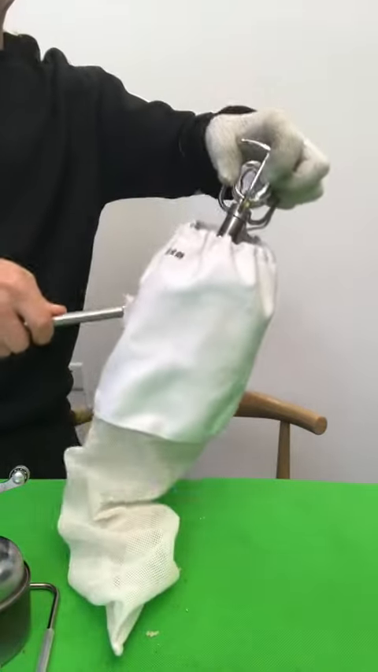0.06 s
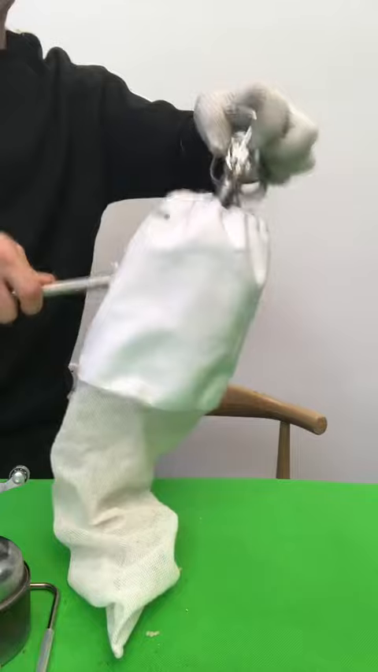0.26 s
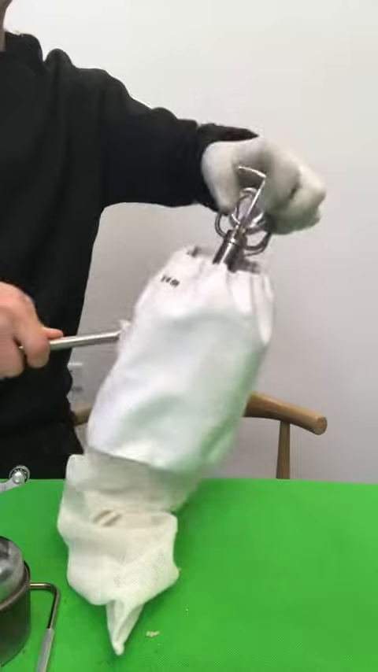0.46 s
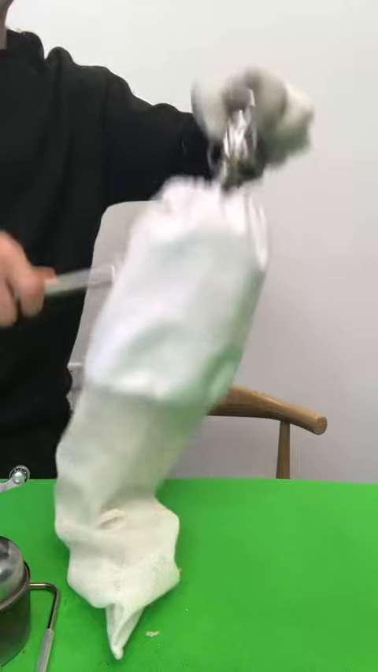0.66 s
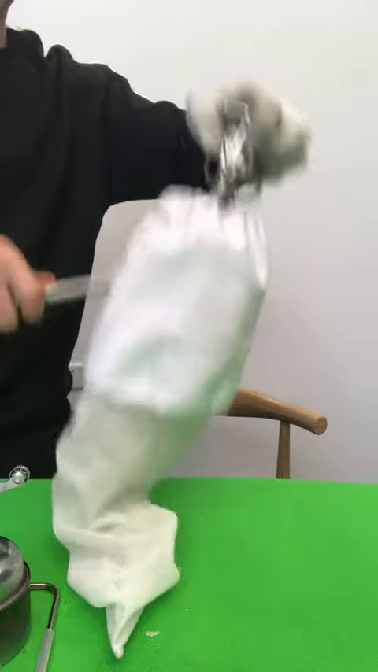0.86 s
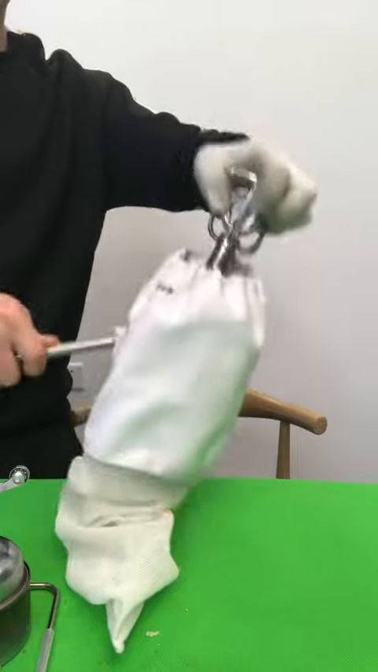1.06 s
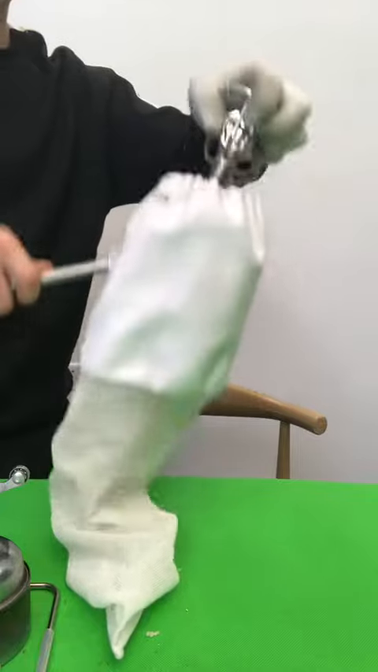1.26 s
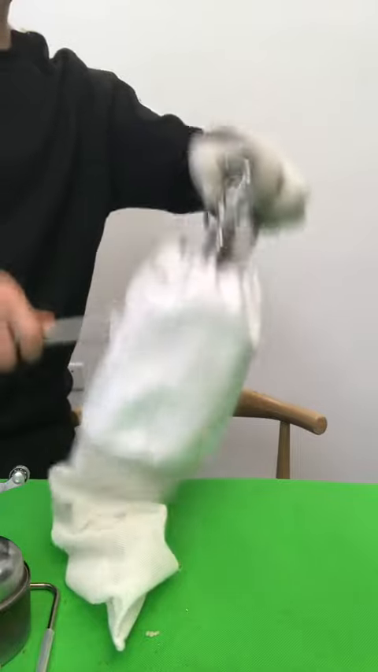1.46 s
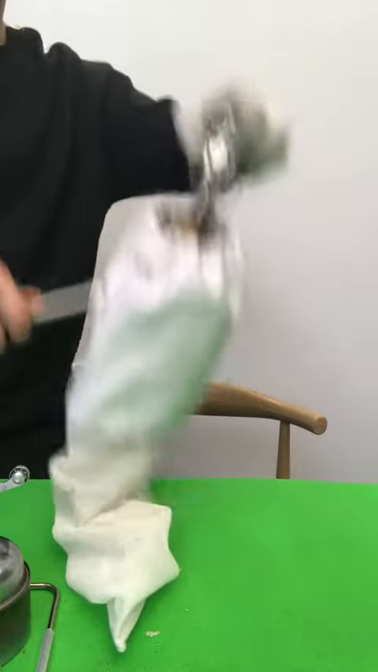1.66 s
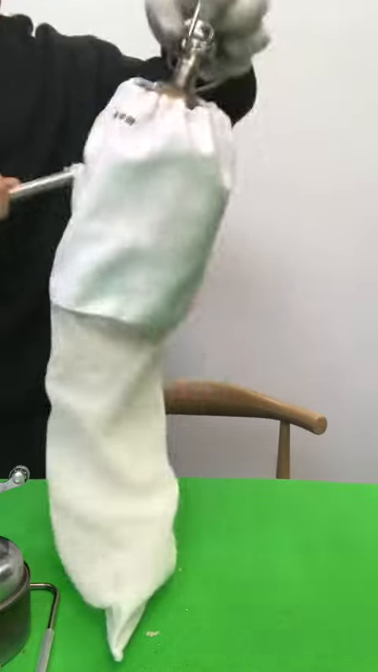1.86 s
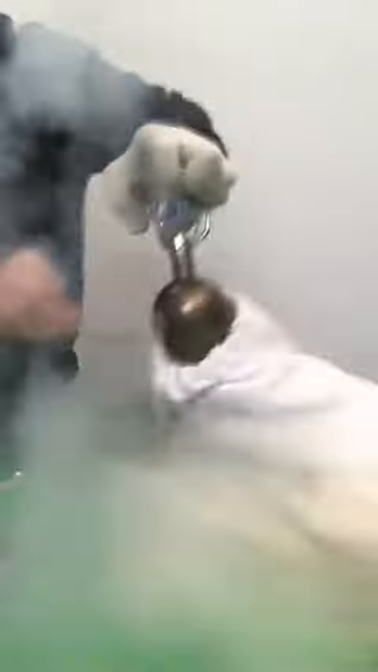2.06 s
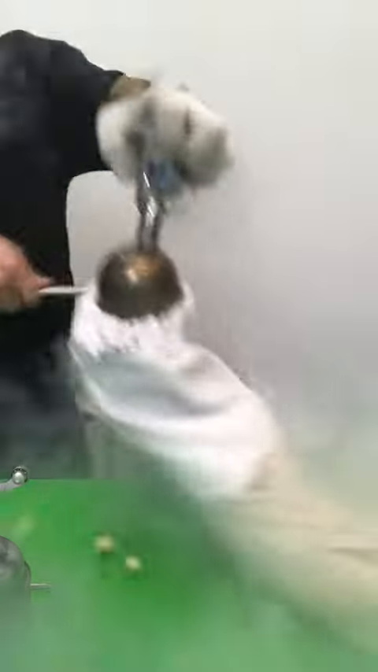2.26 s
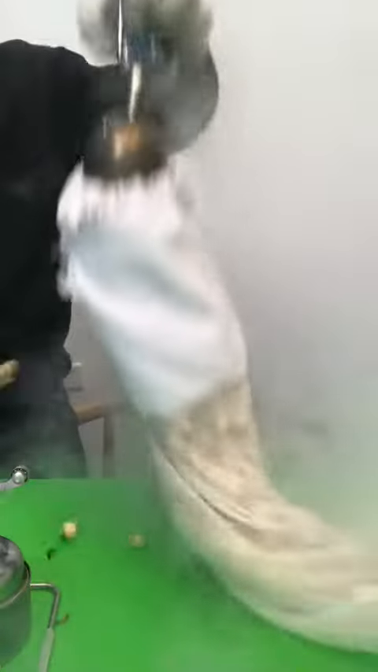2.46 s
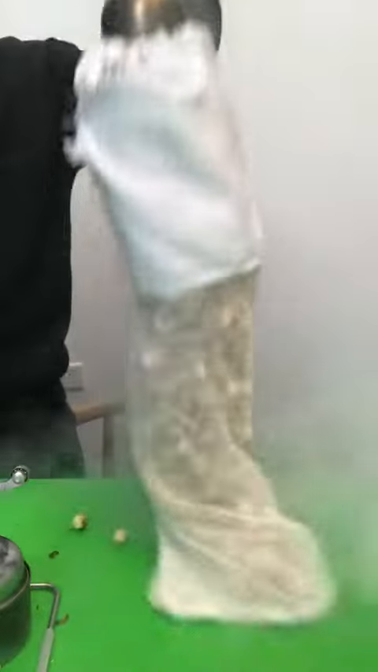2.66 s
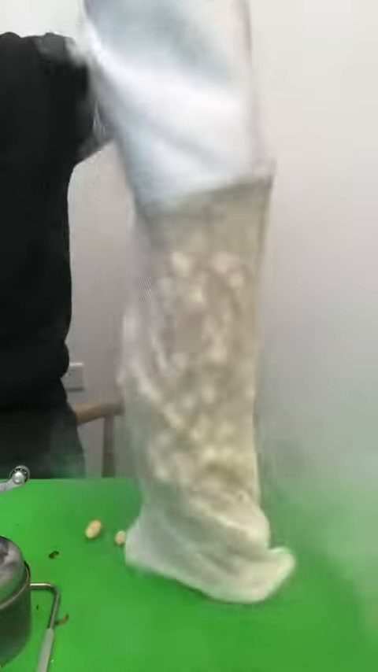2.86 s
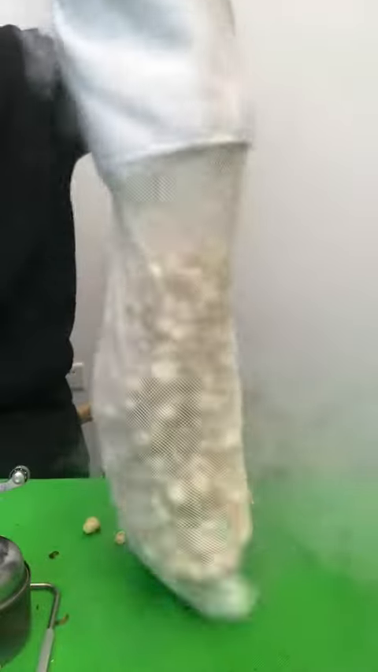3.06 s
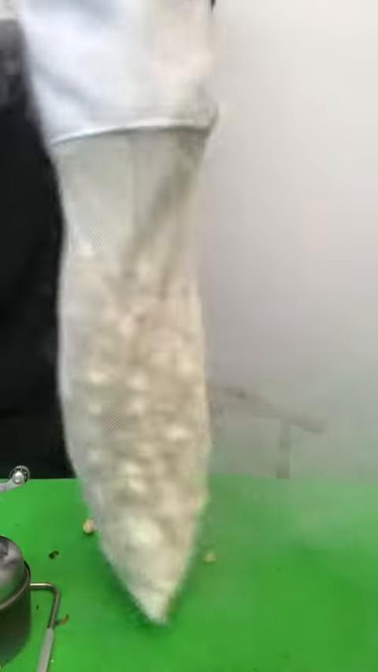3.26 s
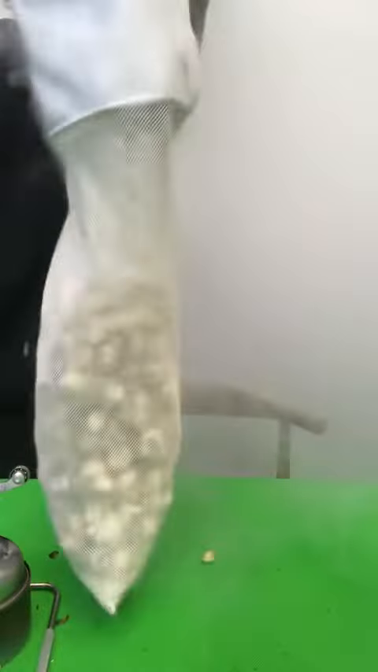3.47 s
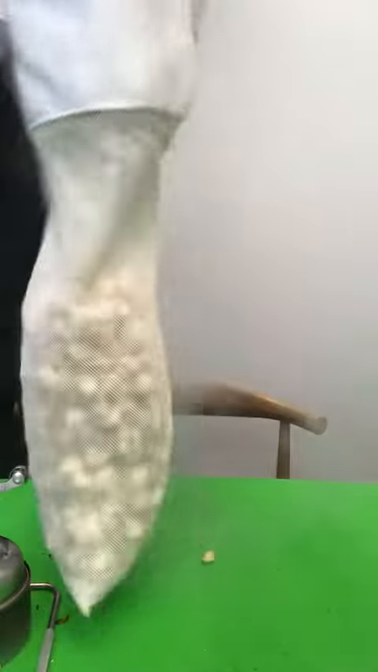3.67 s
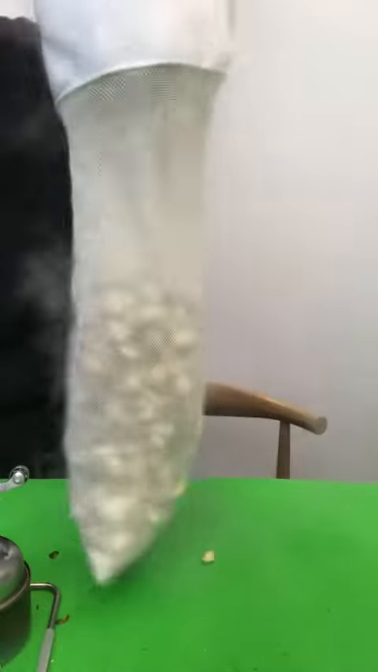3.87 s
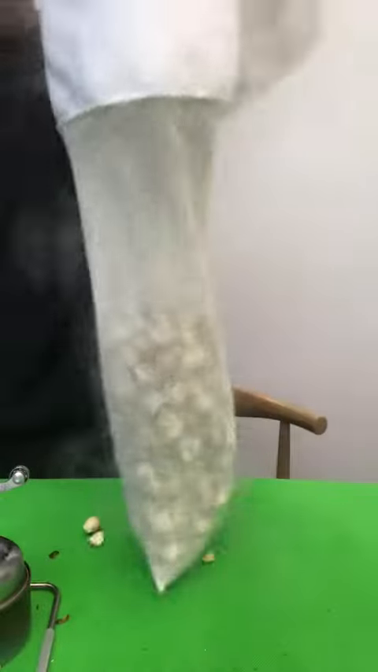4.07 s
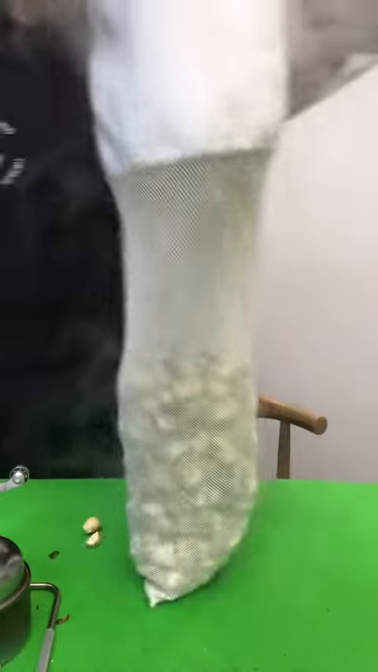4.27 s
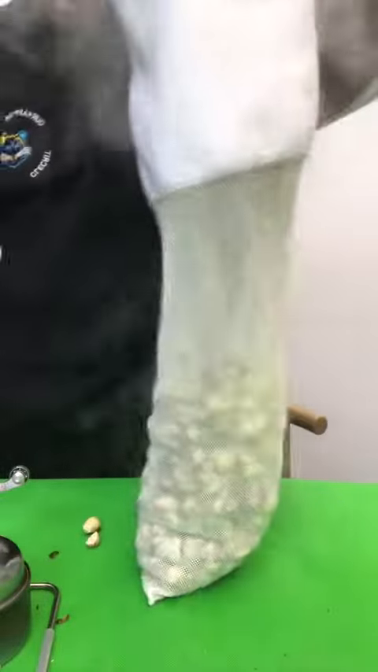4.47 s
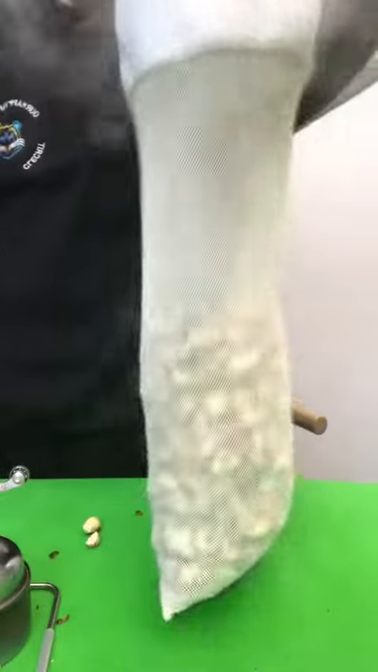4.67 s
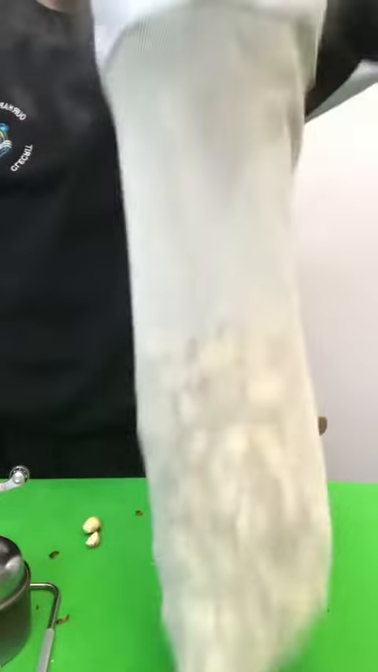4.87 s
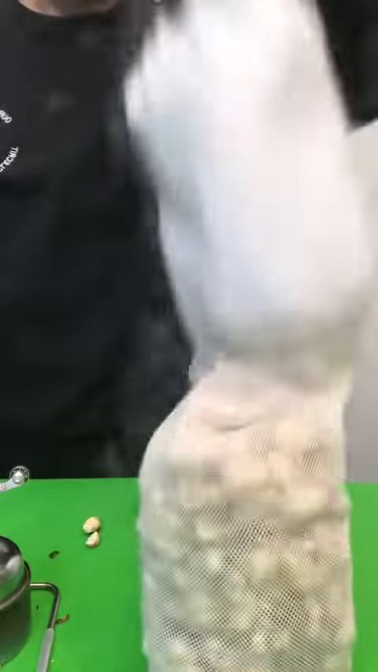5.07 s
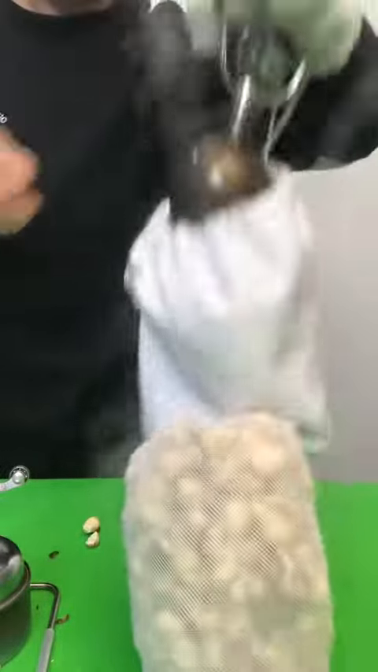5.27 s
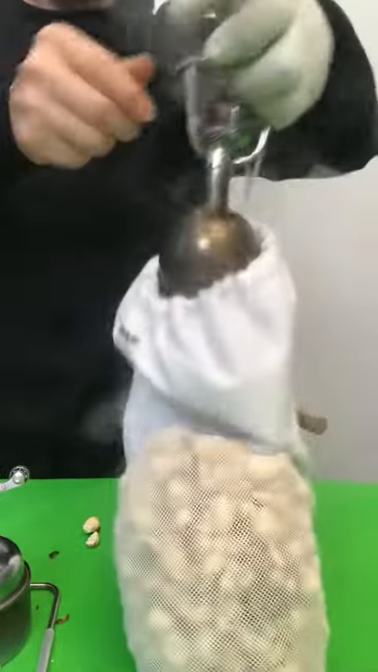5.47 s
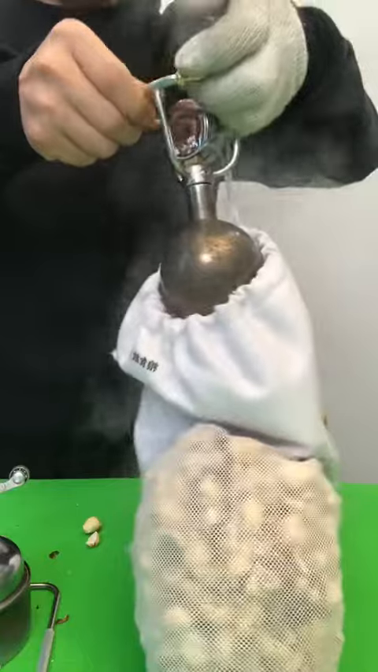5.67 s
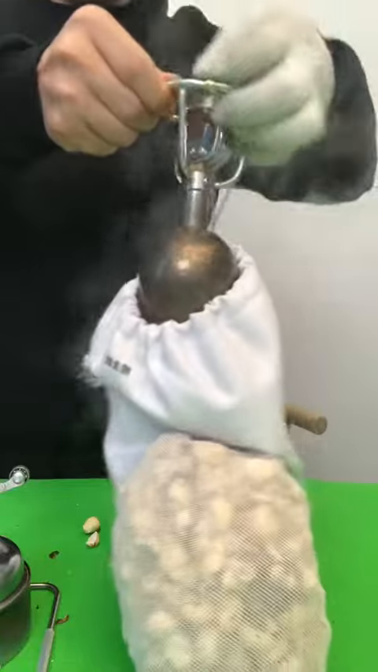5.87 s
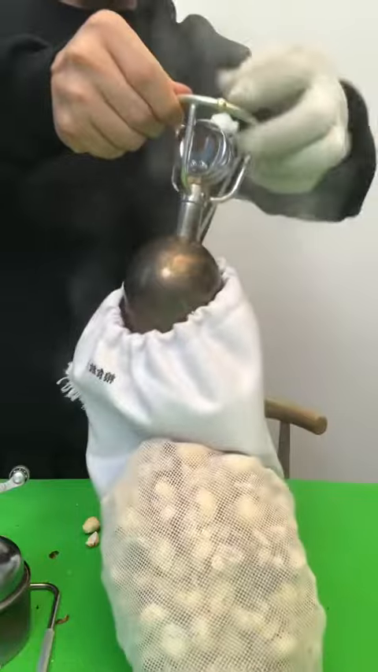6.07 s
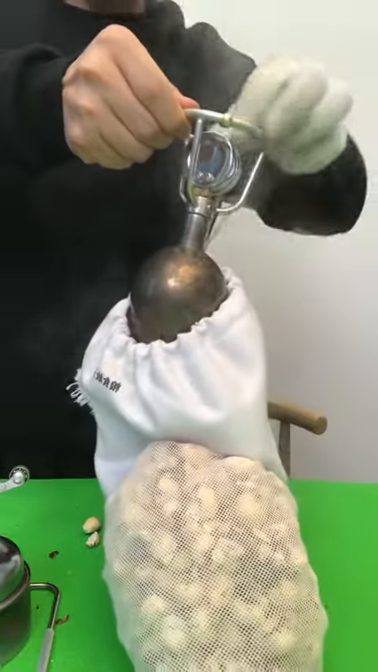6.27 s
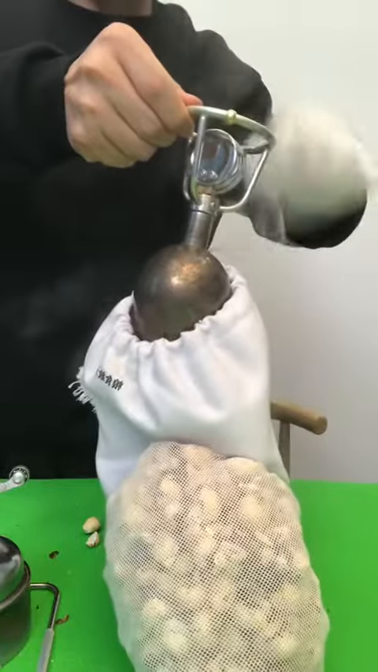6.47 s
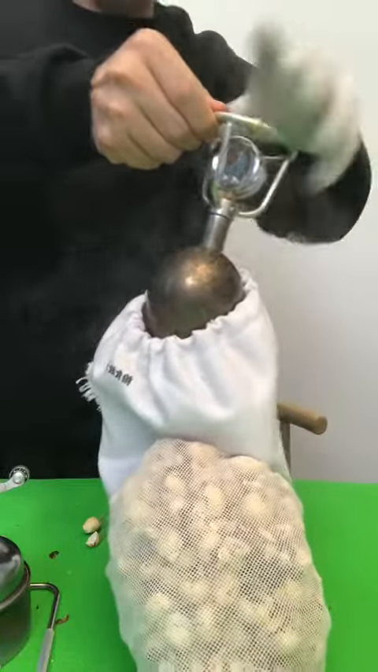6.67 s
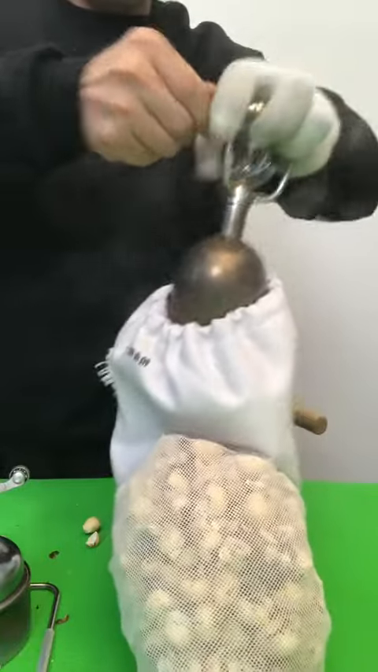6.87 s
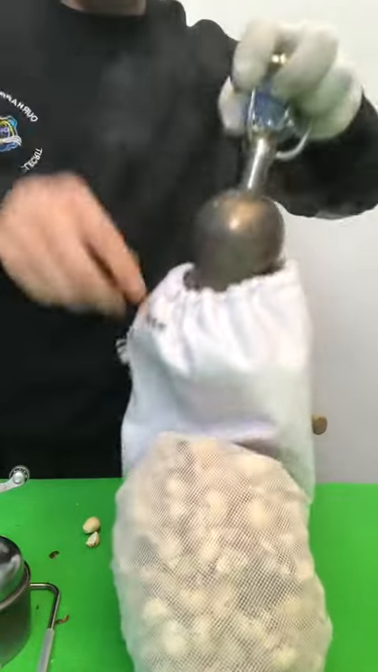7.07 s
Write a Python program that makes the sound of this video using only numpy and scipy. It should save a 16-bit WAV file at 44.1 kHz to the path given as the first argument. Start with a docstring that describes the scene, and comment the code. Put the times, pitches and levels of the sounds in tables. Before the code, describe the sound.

For the first two seconds there is only quiet room air, faint low machinery hum and a light cloth swish around 1.6 s. At 2.03 s a pressure popper bursts with an extremely loud double crack, a short blast of steam and a deep boom; the level is pushed down, then swells back under an echo lasting nearly a second, with a dry snap at 2.25. From 2.85 to 4.2 s puffed grain rustles and hisses crisply in mesh while steel handle links clink rapidly, bright and high, with scrapes and thin squeaks. Table thumps and dry pattering come at about 4.4 s. Another rustle with clinks and a squeak follows at 5 s, then softer shuffling. Around 5.95 to 6.25 s a wire bail taps and pings with small squeaks. A dull knock sounds at 6.7 s, then sharp clinks and a brief rustle from 6.9 to 7.1 s.

```python
"""A small pressure popper bursts open: sharp shocks, a blast of steam and grain into a cloth bag, a boom and an echo.
Then it is shaken out: handle links clink, scrape and squeak, and puffed grain rustles in the mesh.
Things thump on the table, and the steel bail pings. Knocks are ringing sines; steam, grain and air are coloured noise.
The bag swishes before the bang. The recorder's gain ducks under the bang and swells back under the echo."""
import sys
import numpy as np
from scipy import signal
from scipy.fft import rfft, irfft, next_fast_len
from scipy.io import wavfile
from scipy.ndimage import uniform_filter1d, minimum_filter1d

SR = 44100
rng = np.random.default_rng(int(sys.argv[2]) if len(sys.argv) > 2 else 0)


def master_out(mix):
    """Clip the mix to full scale and print it as 16-bit PCM to the path in sys.argv[1]."""
    frames = np.transpose(np.atleast_2d(mix))
    ceiling = np.clip(frames, -1, 1)
    pcm = np.round(ceiling * 32767).astype(np.int16)
    wavfile.write(sys.argv[1], SR, pcm)


N = 313232
TIME = np.arange(N) / SR


def from_db(db):
    """Turn decibels into a gain."""
    return 10 ** (np.asarray(db) / 20)


def rms_one(x):
    """Scale a sound to rms 1."""
    return x / np.sqrt(np.mean(x ** 2) + 1e-20)


def at_hz(points, hz):
    """Read a curve between its points, along a log-frequency axis."""
    f, value = np.transpose(points)
    return np.interp(np.log(hz + 1e-9), np.log(f), value)


def add(out, s, sound):
    """Mix a sound in, starting at s seconds."""
    start = round(s * SR)
    out[start:start + len(sound)] += sound[:max(N - start, 0)]


def colour(x, spectrum):
    """Shape a noise to a spectrum, drop what lies below 15 Hz, and scale to rms 1."""
    size = next_fast_len(len(x))
    hz = np.arange(size // 2 + 1) * SR / size
    shaped = rfft(x, size) * from_db(at_hz(spectrum, hz)) * (hz > 15)
    return rms_one(irfft(shaped, size)[:len(x)])


def fade(t, t60):
    """Die away smoothly, by 60 dB in t60 seconds."""
    return np.exp(-np.log(1000) * t / t60)


def surge(peak_s, rise_s, t60):
    """Climb 20 dB in the rise time, peak at 1, then die away."""
    t = TIME - peak_s
    level_db = np.minimum(20 * t / rise_s, -60 * t / t60)
    return from_db(np.maximum(level_db, -200))


def ring(x, hz, t60):
    """A resonance: a click of size 1 sets a dying sine of about height 1 ringing."""
    r, w = fade(1 / SR, t60), 2 * np.pi * hz / SR
    return signal.lfilter([0, np.sin(w)], [1, -2 * r * np.cos(w), r * r], x + 1e-18)


def strike(times, levels_db, modes, spread_db):
    """Blows on one body: each excites every mode with a random strength and sign."""
    out = np.zeros(N)
    at = np.minimum(np.round(np.asarray(times) * SR).astype(int), N - 1)
    for hz, mode_db, t60 in modes:
        clicks = np.zeros(N)
        sizes_db = levels_db + mode_db + spread_db * rng.standard_normal(len(at))
        clicks[at] = from_db(sizes_db) * rng.choice([-1, 1], len(at))
        out += ring(clicks, hz, t60)
    return out


def grains(per_s, spread_db):
    """Tiny contacts at random moments, of uneven size and random sign."""
    sizes = from_db(spread_db * np.minimum(rng.exponential(1, N), 4))
    return (rng.random(N) < per_s / SR) * sizes * rng.choice([-1, 1], N)


def dying_noise(spectrum, t60s, hold):
    """Two seconds of noise that starts near rms 1, holds, then dies at a different pace in each band."""
    t = TIME[:2 * SR]
    bins = rfft(colour(rng.standard_normal(len(t)), spectrum))
    hz, centres = np.arange(len(bins)) * SR / len(t), np.geomspace(30, 16000, 14)
    out = np.zeros(len(t))
    for f, row in zip(centres, np.eye(len(centres))):
        band = irfft(bins * np.interp(hz, centres, row))
        out += band * fade(np.maximum(t - hold, 0), at_hz(t60s, f))
    return out


# steel on steel, spectrum shape: [f/Hz, level/dB per Hz]
TICK_SPECTRUM = [(900, -2), (2500, 8), (5200, 1), (7000, 2), (10500, -7.5), (13000, -13.5), (16000, -19)]


def tick(t60, grit_db=3.0):
    """A hard contact: a short burst of uneven tiny impacts."""
    t = TIME[:SR // 8]
    impacts = rng.standard_normal(len(t))
    # each grit value lasts 32 samples
    grit = np.repeat(rng.standard_normal(len(t)), 32)[:len(t)]
    return colour(impacts * from_db(grit_db * grit), TICK_SPECTRUM) * fade(t, t60)


# room air, spectrum shape: [f/Hz, level/dB per Hz]
AIR_SPECTRUM = [(12, -41), (20, -8), (32, -2.5), (55, -2), (107, -12.5), (130, -15), (163, -14), (198, -16),
                (293, -16.5), (485, -26), (738, -24.5), (1190, -27), (2600, -40), (8890, -51.5),
                (16000, -70.5)]
# distant machinery: [f/Hz, width/Hz, level/dB]
HUMS = [(47.4, 8.8, -52), (103.3, 4.87, -56), (307, 30, -72)]


def background(air_db=-47.5):
    """Room air is steady noise; each distant hum is noise through a narrow resonance."""
    hum = np.zeros(N)
    for hz, width, level_db in HUMS:
        t60 = np.log(1000) / np.pi / width
        # the first second is dropped so that the hum is already under way
        steady = ring(rng.standard_normal(N + SR), hz, t60)[SR:]
        hum += from_db(level_db) * rms_one(steady)
    return from_db(air_db) * colour(rng.standard_normal(N), AIR_SPECTRUM) + hum


# how long the room rings on: [f/Hz, t60/s]
ROOM_T60 = [(60, 0.81), (250, 0.83), (1000, 0.86), (3000, 0.93), (6000, 0.82), (12000, 0.45)]


def room(x, wet_db=-18.0):
    """The walls smear the small sounds into a dense tail, like noise that dies away."""
    response = dying_noise([(100, 1.5), (5000, -10.0), (15000, -4.5)], ROOM_T60, 0)
    response /= np.sqrt(np.sum(response ** 2))
    return from_db(wet_db) * signal.fftconvolve(x, response)[:N]


# the bag swishing as it is swung: [t/s, level/dB]
SWING = [(0, -64.5), (1.35, -68), (1.52, -58.5), (1.61, -50), (1.66, -56), (1.72, -54.5), (1.85, -68),
         (2.0, -60), (2.1, -100)]
# swish of the cloth, spectrum shape: [f/Hz, level/dB per Hz]
CLOTH_SPECTRUM = [(300, 1), (620, 0.5), (850, -3), (2000, -8), (5000, -15), (8000, -25), (15000, -38.5)]
# each shake sets the grain sliding, levels before the overall trims:
# [peak t/s, rise/s, t60/s, rustle level/dB, crisp hiss level/dB]
SHAKES = [(2.85, 0.12, 0.73, -58, -60.5), (3.054, 0.095, 0.79, -50, -52.5), (3.235, 0.095, .5, -46, -54),
          (3.28, .04, 0.24, -50.5, -43), (3.42, 0.12, 0.81, -45.5, -50.5),
          (3.603, 0.04, 0.46, -44.5, -41.5), (3.804, 0.15, 1.02, -49.5, -50),
          (4.2, 0.052, 1.75, -55.5, -59.5), (4.35, 0.034, 0.93, -54.5, -76),
          (4.55, 0.17, 0.41, -61.5, -62.5), (4.981, 0.046, 0.63, -45.5, -48),
          (5.224, 0.093, 0.34, -49, -52), (5.33, 0.05, .4, -53, -58.5), (5.399, 0.035, .6, -54, -56),
          (5.47, 0.12, 0.94, -53, -58), (5.85, 0.1, 1.2, -57, -63.5), (6.01, 0.21, 0.54, -58.5, -65),
          (6.17, 0.21, 0.88, -58, -66.5), (6.76, 0.44, 1.3, -65.5, -76), (6.92, 0.073, 0.21, -50.5, -53),
          (7.025, .045, 0.14, -45, -65)]
# grain rustling, spectrum shape: [f/Hz, level/dB per Hz]
RUSTLE_SPECTRUM = [(250, 0), (600, -2), (1000, 3.5), (1400, -2), (1900, -3.5), (2900, 1.5), (3700, -5),
                   (5300, -2), (7000, -10.5), (11000, -25.5)]
# crisp hiss of the grain, spectrum shape: [f/Hz, level/dB per Hz]
CRISP_SPECTRUM = [(3000, -7), (5500, -3.5), (7500, 1.5), (10000, -3), (11500, -7), (13500, -16),
                  (16000, -22)]
CRISP_EXPONENT = 1.5   # the hiss swells later and dies sooner than the rustle


def bag(rustle_db=4.5, crisp_db=2.0, clump_db=1.5):
    """Cloth swishes; at each shake puffed grains rub on each other and the mesh, slipping in small clumps."""
    rustle, crisp = np.zeros(N), np.zeros(N)
    for s, rise, t60, level_db, hiss_db in SHAKES:
        flow = surge(s, rise, t60)
        rustle = np.hypot(rustle, from_db(level_db) * flow)
        crisp = np.hypot(crisp, from_db(hiss_db) * flow ** CRISP_EXPONENT)
    unevenness = colour(rng.standard_normal(N), [(120, 0), (400, -24), (2000, -80)])
    clumps = from_db(clump_db * unevenness)
    swing_s, swing_db = np.transpose(SWING)
    swing = from_db(np.interp(TIME, swing_s, swing_db, left=-120, right=-120))
    swish = swing * colour(rng.standard_normal(N), CLOTH_SPECTRUM)
    rubbing = from_db(rustle_db) * rustle * colour(grains(per_s=4000, spread_db=2.0), RUSTLE_SPECTRUM)
    crackle = from_db(crisp_db) * crisp * colour(grains(per_s=3600, spread_db=1.0), CRISP_SPECTRUM)
    return swish + clumps * (rubbing + crackle)


# links and bail slipping in their pivots: [t/s, length/s, peak level/dB, f/Hz]
SQUEAKS = [(3.25, 0.09, -53, 7060), (3.632, 0.13, -41, 7060), (3.716, .06, -47, 1285),
           (3.798, 0.087, -45.5, 1500), (4.372, 0.075, -51, 3010), (4.975, 0.14, -47, 1218),
           (5.951, 0.11, -47, 1273), (6.13, .16, -52.5, 1276), (6.888, 0.091, -49.5, 1454)]
SQUEAK_WAVER_HZ, SQUEAK_SWELL = 11, 0.8   # rms pitch waver; shape of the swell (exponent)


def squeaks():
    """Steel slipping on steel: a thin wavering tone that swells and fades with each slip."""
    out = np.zeros(N)
    waver = SQUEAK_WAVER_HZ * colour(rng.standard_normal(N), [(40, 0), (200, -40), (2000, -100)])
    for s, length, peak_db, hz in SQUEAKS:
        progress = np.clip((TIME - s) / length, 0, 1)
        swell = np.abs(np.sin(np.pi * progress)) ** SQUEAK_SWELL
        out += from_db(peak_db) * swell * np.sin(2 * np.pi * np.cumsum(hz + waver) / SR)
    return out


# loose kernels and small dry contacts, level before the tick and body trims: [t/s, level/dB, f/Hz]
PATTER = [(3.004, -38.5, 5180), (4.0786, -41.5, 2900), (4.3557, -37.5, 3330), (4.363, -40, 3350),
          (4.3793, -40, 3330), (4.411, -36.5, 3370), (4.4882, -38, 3070), (4.9788, -36, 4900),
          (5.5038, -42, 3500), (5.6022, -42, 4100), (5.661, -49, 3030), (6.105, -50, 3800)]


def patter(tick_db=-8.0, body_db=-3.5):
    """Dry little hits that barely ring: a tick with a broad resonance."""
    out, t = np.zeros(N), TIME[:SR // 8]
    for s, level_db, hz in PATTER:
        body = rms_one(ring(rng.standard_normal(len(t)), hz, t60=0.008)) * fade(t, t60=0.038)
        hit = from_db(tick_db) * tick(t60=0.019) + from_db(body_db) * body
        add(out, s, from_db(level_db) * hit)
    return out


# the bail tapping its stop, level before the mode levels: [t/s, level/dB]
TAPS = [(5.951, -32.5), (6.1218, -38.5), (6.2384, -40.5)]
# ringing modes of the bail, relative levels: [f/Hz, level/dB, t60/s]
BAIL_MODES = [(1246, -7, 0.14), (2725, 3.5, 0.07), (4630, -19, 0.11), (8250, -27, 0.21)]


def bail(tick_db=-10.5):
    """The wire bail taps its stop and pings in a few modes, with a tick at each contact."""
    s, level_db = np.transpose(TAPS)
    out = strike(s, level_db, BAIL_MODES, spread_db=0.5)
    for s, level_db in TAPS:
        add(out, s, from_db(level_db + tick_db) * tick(t60=0.023))
    return out


# blows on the table, body level before the mode levels: [t/s, knock level/dB, body level/dB]
THUMPS = [(4.257, -59, -42.5), (4.4156, -23, -28), (4.421, -24, -44), (4.443, -42, -30.5),
          (4.487, -42, -34), (6.674, -26.5, -44), (6.974, -34.5, -64)]
# ringing modes of the table, relative levels: [f/Hz, level/dB, t60/s]
TABLE_MODES = [(48.55, -0.5, 0.74), (105.4, -9, 0.37), (164, -7, 0.33), (187, -9.5, 0.25),
               (236.6, -9, 0.44), (291, -9.5, 0.26), (365, -10.5, 0.17), (450, -12.5, 0.11),
               (592, -17, 0.066), (770, -44, 0.06)]


def table(knock_hz=500, knock_t60=0.0097):
    """Each blow mixes a dead knock of a few cycles with the ringing of the whole table."""
    times, _, body_db = np.transpose(THUMPS)
    out, t = strike(times, body_db, TABLE_MODES, spread_db=3.5), TIME[:SR // 8]
    for s, knock_db, _ in THUMPS:
        add(out, s, from_db(knock_db) * np.sin(2 * np.pi * knock_hz * t) * fade(t, knock_t60))
    return out


def snap(s=2.2465, level_db=-18.5):
    """One dry snap amid the echo: a single hard contact."""
    out = np.zeros(N)
    add(out, s, from_db(level_db) * tick(t60=0.031))
    return out


# handle links knocking together, the hand damping some; levels before the overall trims:
# [t/s, ring level/dB, ring f/Hz, t60/s, tick level/dB]
CLINKS = [(2.8419, -48.5, 4960, 0.14, -67), (3.045, -38, 5100, .07, -46), (3.0674, -26.5, 4900, 0.068, -46),
          (3.1852, -38, 4760, 0.19, -51), (3.2266, -28, 4740, 0.12, -35.5), (3.2568, -25.5, 4750, 0.1, -43),
          (3.359, -24, 4760, 0.091, -39), (3.373, -31.5, 4820, 0.061, -39.5),
          (3.3984, -23.5, 4800, 0.082, -38), (3.4114, -24, 4780, 0.076, -50),
          (3.461, -28, 4800, 0.066, -46), (3.5495, -32, 4790, 0.044, -51), (3.5575, -23, 4800, .04, -44),
          (3.5934, -33, 4740, 0.18, -33.5), (3.6152, -28.5, 4640, 0.13, -37),
          (3.6514, -32.5, 4790, 0.071, -52), (3.7421, -35, 4650, 0.1, -60),
          (3.7684, -29.5, 4890, 0.07, -41.5), (3.7985, -27.5, 4810, 0.052, -42),
          (3.8374, -28, 4880, 0.066, -40), (3.9432, -26.5, 4760, 0.083, -56),
          (3.9907, -35.5, 4870, 0.07, -51), (4.144, -40.5, 4860, .075, -63),
          (4.1754, -36, 4800, 0.042, -48), (4.1829, -31.5, 4800, 0.061, -54),
          (4.8735, -52, 4730, 0.16, -71), (4.955, -29, 4760, 0.11, -55), (5.037, -32, 4820, 0.084, -56),
          (5.0543, -31, 4570, 0.07, -55), (5.0906, -31, 4830, .085, -53), (5.284, -39, 4770, 0.046, -59),
          (5.8724, -30, 4600, 0.026, -42.5), (6.2874, -30, 4700, 0.033, -46.5),
          (6.8903, -20.5, 4810, 0.048, -37.5), (6.913, -35, 4730, .06, -45), (6.925, -26, 4750, 0.073, -44),
          (6.9547, -39, 4700, 0.046, -56), (6.997, -37, 4450, .05, -58), (7.0065, -24, 4690, 0.053, -56),
          (7.0246, -38, 4960, 0.05, -56), (7.0783, -18, 4785, 0.081, -38.5)]
# ringing modes of the handle's steel frame, relative levels: [f/Hz, level/dB, t60/s]
FRAME_MODES = [(720, -20, .07), (975, -7, 0.052), (1915, -15, 0.019), (1963, -10.5, 0.072),
               (2760, -11.5, 0.27), (2850, -17, 0.11), (3140, -46, 0.063), (3955, -5.5, 0.058),
               (4340, -8, 0.073), (4460, -6, 0.058), (5270, -16, 0.074), (5490, 1.5, 0.03),
               (5700, -15, 0.04), (6000, -11.5, 0.089), (7200, -17, .1), (8470, -18, 0.11)]
# the links scrape just before a knock and rattle on after it, for this many ring times
CHATTER_LEAD_S, CHATTER_LASTS = 0.0091, 3.05


def dragging(drag_db=-13.5, rattle_db=-8.5, rattle_share=0.38):
    """Around each knock the links chatter finely and rattle the frame, the more the harder it is."""
    chatter = grains(per_s=1100, spread_db=2.5)
    link_ring = rms_one(ring(chatter, 4730, 0.024) - ring(chatter, 4830, 0.084) + ring(chatter, 4830, 0.0098))
    frame = np.zeros(N)
    for k, (hz, mode_db, t60) in enumerate(FRAME_MODES):
        # neighbouring modes have opposite signs
        frame += (-1) ** k * from_db(mode_db) * ring(chatter, hz, rattle_share * t60)
    power = np.zeros(N)
    for s, level_db, _, t60, _ in CLINKS:
        power += (from_db(level_db) * surge(s, CHATTER_LEAD_S, CHATTER_LASTS * t60)) ** 2
    return from_db(drag_db) * np.sqrt(power) * (link_ring + from_db(rattle_db) * rms_one(frame))


# the grip shifts the links' lowest mode and damps or frees the highest:
# [t/s, low mode f/Hz, top mode relative level/dB]
GRIP = [(3.05, 1510, -28), (3.25, 1370, -30), (3.45, 1570, -30), (3.58, 1397, -34), (3.83, 1533, -32.5),
        (4.18, 1440, -36), (4.951, 1220, -35), (6.29, 1520, -41), (6.89, 1426, -24), (7.08, 1300, -28)]
# crowded high modes of a hard knock, spectrum shape: [f/Hz, level/dB per Hz]
ZING_SPECTRUM = [(6000, -21), (8500, -1), (10600, 0), (11500, -11), (14000, -21)]
TOP_MODE_HZ = 11300
CONTACT_S = 0.00059   # time constant with which a knock sets a link ringing
FRAME_DB, FRAME_FOLLOWS = -34.5, 0.42   # frame at a 0 dB clink; share of the clink's dB that it follows


def links(ring_db=-1.5, tick_db=0.0, zing_db=-5.5, low_db=-6.5, split_hz=90, twin_db=-8,
          rebound_db=-12.0, rebound_s=0.0058):
    """Each link rings in a close pair of bending modes, a low and a top mode, rebounds, and shakes the frame."""
    out, t = np.zeros(N), TIME[:SR // 3]
    times, levels_db, *_ = np.transpose(CLINKS)
    grip_s, lows_hz, tops_db = np.transpose(GRIP)
    shakes_db = FRAME_DB + FRAME_FOLLOWS * levels_db
    attack = 1 - np.exp(-t / CONTACT_S)
    chance = rng.uniform(-1, 1, (len(CLINKS), 3))
    for clink, shake_db, (split, late, neighbour) in zip(CLINKS, shakes_db, chance):
        s, level_db, hz, t60, contact_db = clink
        twin_hz = hz + split_hz * (1 + split / 2)
        pair = np.sin(2 * np.pi * hz * t) + from_db(twin_db) * np.sin(2 * np.pi * twin_hz * t)
        low_hz, top_db = np.interp(s, grip_s, lows_hz), np.interp(s, grip_s, tops_db)
        low = np.sin(2 * np.pi * low_hz * t) * fade(t, t60=0.24)
        top = np.sin(2 * np.pi * TOP_MODE_HZ * t) * attack * fade(t, t60=0.13)
        add(out, s, from_db(level_db + ring_db) * pair * attack * fade(t, t60))
        add(out, s, from_db(shake_db + low_db) * low)
        add(out, s, from_db(level_db + top_db) * top)
        add(out, s, from_db(contact_db + tick_db) * tick(t60=0.055))
        zing = colour(rng.standard_normal(len(t)), ZING_SPECTRUM) * attack * fade(t, t60)
        add(out, s, from_db(contact_db + zing_db) * zing)
        # the rebound catches a neighbouring link of slightly different pitch
        second = np.sin(2 * np.pi * (hz + 230 * neighbour) * t) * attack * fade(t, t60=0.022)
        again = s + rebound_s * (1 + late / 2)
        add(out, again, from_db(level_db + rebound_db) * second)
        add(out, again, from_db(contact_db - 6) * tick(t60=0.013))
    return out + strike(times, shakes_db, FRAME_MODES, spread_db=4.0)


BANG_S = 2.0262
# pressure fronts as the lid flies open: [delay t/s, length/s, peak level/dB]
SHOCKS = [(0, 0.00061, 21), (.001, 0.00095, 21.5), (.0026, .0005, 7.5), (0.026, 0.00034, 3)]
# escaping steam, spectrum shape: [f/Hz, level/dB per Hz]
JET_SPECTRUM = [(25, -12), (55, -7.5), (90, -8), (140, -7.5), (200, -2), (320, -15), (520, -13), (720, -19),
                (1080, -9.5), (1330, -20), (2000, -24), (6000, -28.5), (9000, -36), (16000, -56)]
# how fast the steam blast dies: [f/Hz, t60/s]
JET_T60 = [(40, 0.15), (200, 0.29), (1000, 0.25), (5000, 0.26), (14000, 0.28)]
# the room's answer to the bang, spectrum shape: [f/Hz, level/dB per Hz]
ECHO_SPECTRUM = [(35, -69), (60, -22), (140, -0.5), (179, -16), (277, -10), (332, -19.5), (364, -20),
                 (399, -30.5), (536, -20.5), (629, -33.5), (970, -20), (1400, -33.5), (2840, -40.5),
                 (5880, -47.5), (14000, -103.5)]
# low modes of bag, table and room set off by the blast: [f/Hz, level/dB, t60/s]
BOOM_MODES = [(50, 13.5, 0.29), (91.6, -20, 0.72), (133.7, 0.5, 0.84), (134, -40, 8.9), (161, -4, 0.68),
              (203.3, 9.5, 0.44), (243.5, -5, 0.63), (274.4, -8.5, 0.82), (469, -20.5, 0.72),
              (603, -6.5, 0.34), (1096, -11, 0.29)]


def bang(jet_db=9.0, jet_hold=0.041, echo_db=-0.5, echo_rise=0.016, crack_db=8.0):
    """N-shaped shocks with a steel crack, the jet emptying the pot, the low boom and the room's echo."""
    out, t = np.zeros(N), TIME[:2 * SR]
    for delay, length, peak_db in SHOCKS:
        phase = TIME[:SR // 100] / length
        # pressure jumps up, plunges below rest, and recovers
        front = np.interp(phase, [0, .15, .7, 1, 1.4], [0, .55, 1, -1, 0])
        add(out, BANG_S + delay, from_db(peak_db) * front)
    add(out, BANG_S, from_db(crack_db) * tick(t60=0.026))
    jet = dying_noise(JET_SPECTRUM, JET_T60, jet_hold) * (1 - np.exp(-t / 0.0014))
    add(out, BANG_S, from_db(jet_db) * jet)
    echo = dying_noise(ECHO_SPECTRUM, ROOM_T60, 0) * (1 - np.exp(-t / echo_rise))
    add(out, BANG_S, from_db(echo_db) * echo)
    build_up = 1 - np.exp(-TIME / .012)   # the modes do not start at full height
    for hz, mode_db, t60 in BOOM_MODES:
        add(out, BANG_S, from_db(mode_db) * np.sin(2 * np.pi * hz * TIME) * fade(TIME, t60) * build_up)
    return out


def scene():
    """The bang, the handling and the room, at one microphone."""
    handling = links() + dragging() + squeaks() + bail() + patter() + table() + bag() + snap()
    return (bang() + handling + room(handling) + background())[None]


def gain_control(x, ceiling_db=-.5, hold=0.15, release=0.067, slow_share=0.41, slow_release=1.0):
    """Gain ducks quickly when peaks pass the ceiling, waits, then returns: most of it fast, the rest slowly."""
    over_db = np.maximum(20 * np.log10(np.abs(x) + 1e-9) - ceiling_db, 1e-9)
    size = 2 * int(hold * SR / 2) + 1
    # the largest overshoot of the last moments is held
    held_db = -minimum_filter1d(-over_db, size, origin=size // 2, mode="constant")
    held = np.log(held_db + 1e-9)
    # a running maximum on a tilted log scale makes an exponential return
    fast, slow = [np.exp(np.maximum.accumulate(held + TIME / tau) - TIME / tau) for tau in (release, slow_release)]
    cut_db = (1 - slow_share) * fast + slow_share * slow
    ahead = -minimum_filter1d(-cut_db, size=177)   # it looks two milliseconds ahead
    return x * from_db(-uniform_filter1d(ahead, size=89))


def record(dry, cutoff_hz=15900):
    """The recorder's automatic gain, then a steep filter that cuts the top."""
    low_pass = signal.ellip(10, .1, 80, cutoff_hz, fs=SR, output="sos")
    return signal.sosfilt(low_pass, gain_control(dry[0]))[None]


dry = scene()
out = record(dry)
master_out(out)
```